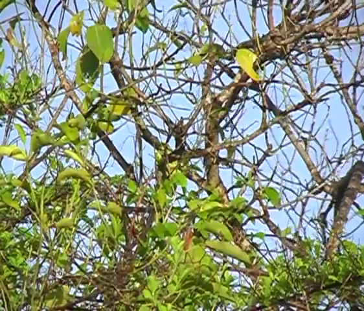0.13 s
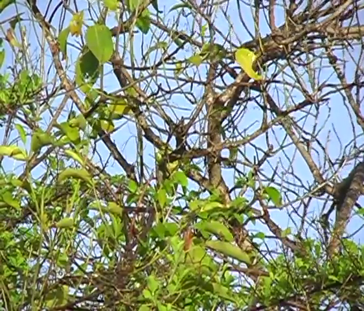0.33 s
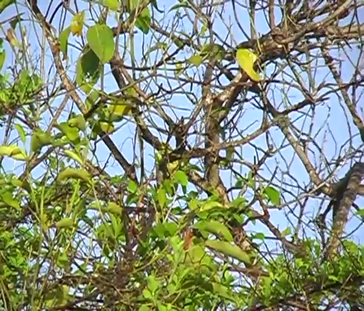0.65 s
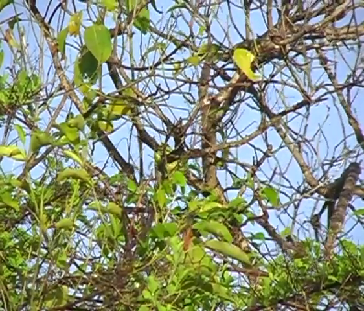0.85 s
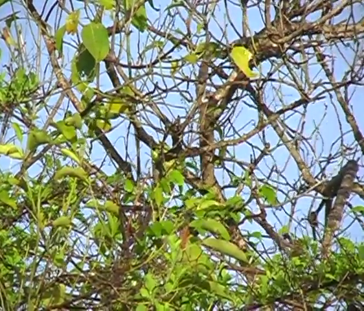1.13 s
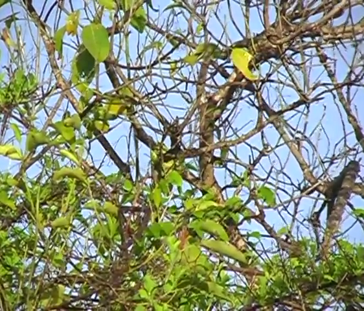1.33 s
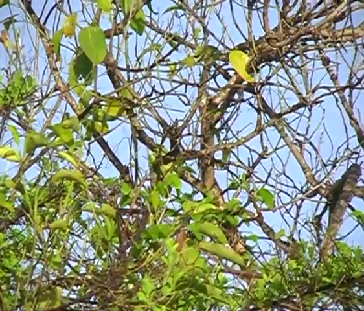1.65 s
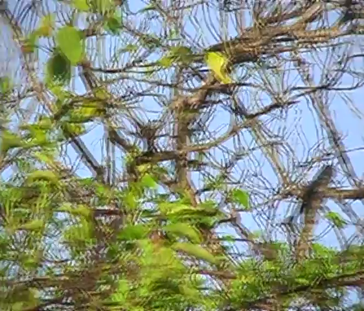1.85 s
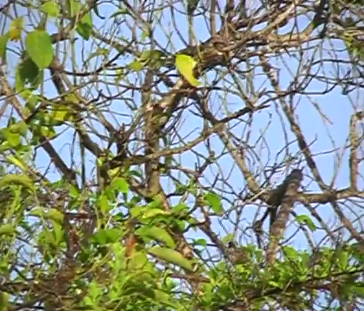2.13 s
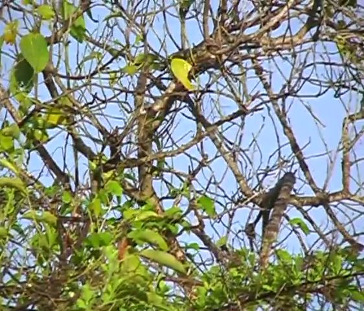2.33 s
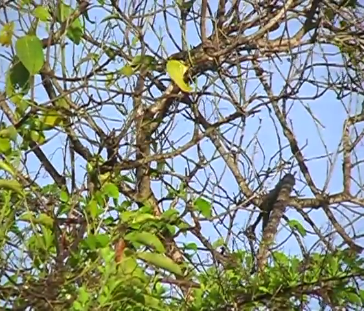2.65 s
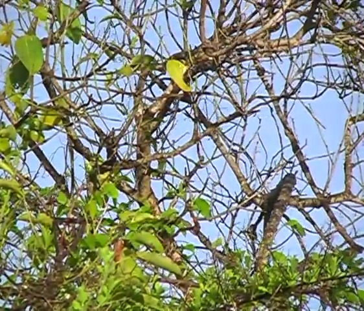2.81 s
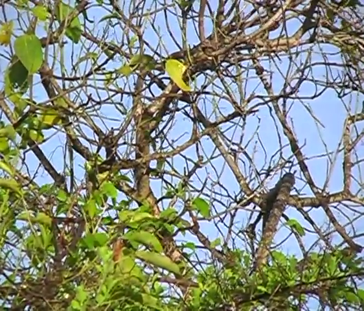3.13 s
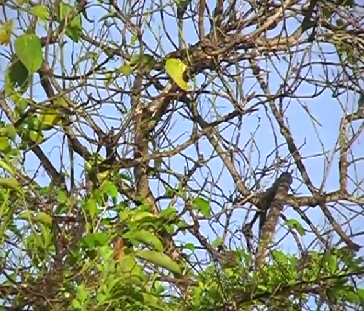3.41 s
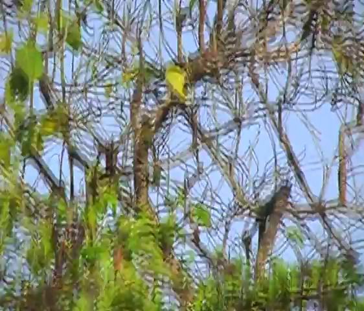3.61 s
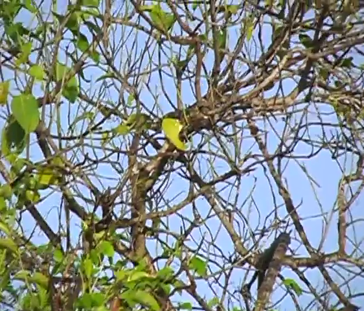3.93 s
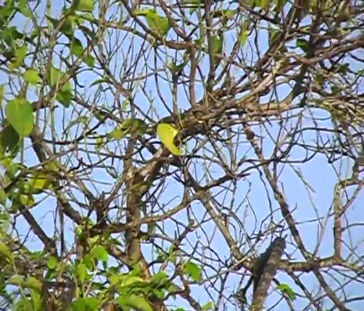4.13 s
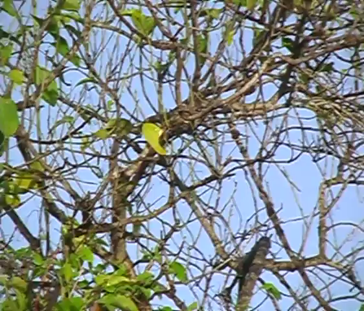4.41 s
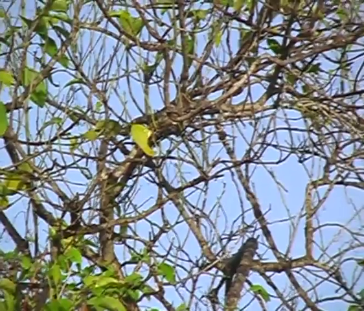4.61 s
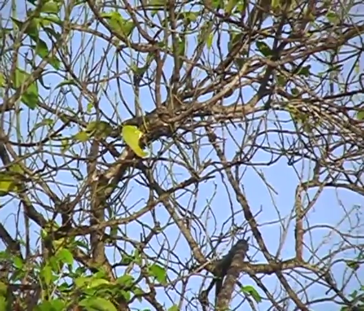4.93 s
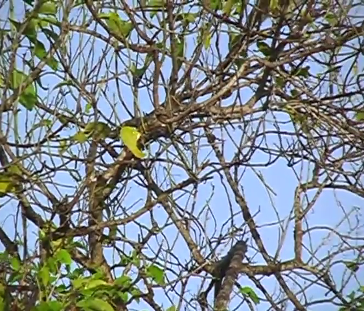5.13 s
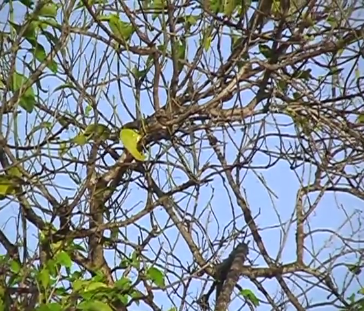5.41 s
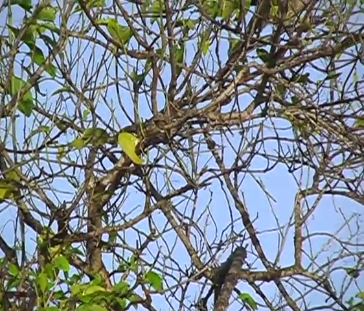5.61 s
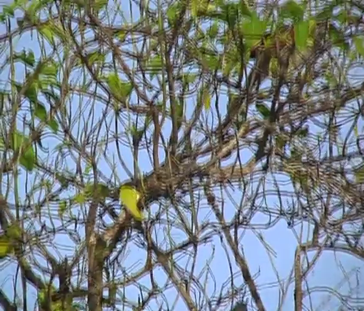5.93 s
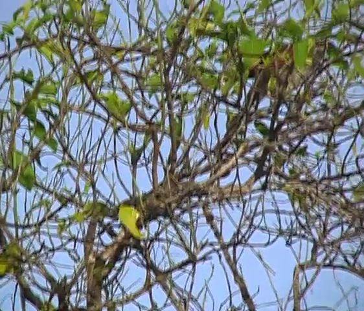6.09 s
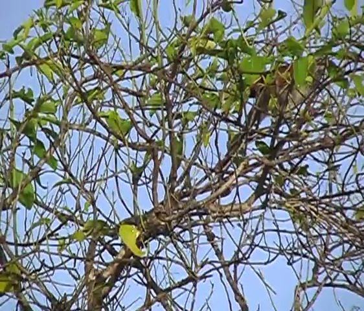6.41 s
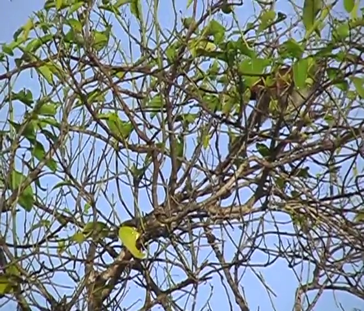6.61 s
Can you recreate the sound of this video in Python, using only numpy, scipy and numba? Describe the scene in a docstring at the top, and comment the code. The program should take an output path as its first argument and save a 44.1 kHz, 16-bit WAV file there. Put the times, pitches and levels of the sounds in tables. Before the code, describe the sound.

Outdoors among trees, a large hornbill gives short, nasal, rasping squawks that rise and suddenly break in pitch. Four early calls are followed by a pause with one small bird's chirp and churr, then three louder, rougher calls, the last longest. Small birds whistle quickly at the start. High cicadas pulse throughout, and a distant engine swells and fades early. The microphone is a few metres away, with a dull woodland tail.

```python
"""A wood: a hornbill squawks from a treetop a few metres off, in rasping notes that break from pitch to pitch.
Its pulses ring windpipe, beak and throat resonances; branches and trees add echoes and a dull tail.
Near-sine glides make small birds' whistles, two with a noisy churr, and at 5.47 s the last squawk's thin high tail.
Cicadas pulse as throbbing noise bands; a distant engine drone, in wavering noise bands, swells and fades
over shaped hiss; a twig ticks once."""
import sys
import numpy as np
from scipy import signal
from scipy.fft import rfft, irfft
from scipy.io import wavfile
from scipy.ndimage import uniform_filter1d
from numba import njit

SR = 44100
rng = np.random.default_rng(int(sys.argv[2]) if len(sys.argv) > 2 else 0)


def wav_record(signal):
    """Record a signal, one row per channel, as 16-bit PCM in the file named by sys.argv[1]."""
    frames = np.transpose(np.atleast_2d(signal))
    bounded = np.clip(frames, -1, 1)
    # unit amplitude maps onto the largest positive 16-bit level
    quanta = np.round(bounded * 32767).astype(np.int16)
    wavfile.write(sys.argv[1], SR, quanta)


N = 298116
TOP_HZ = 15780  # limit of the hornbill's partials and of the final low-pass


def undb(db):
    """dB to gain."""
    return 10 ** (np.asarray(db) / 20)


def level(x, db):
    """Scale to an rms level."""
    return x * undb(db) / np.sqrt(np.mean(x ** 2))


def curve(table):
    """Columns of a timed table, one value per sample."""
    s, *columns = np.transpose(table)
    return [np.interp(np.arange(N) / SR, s, c) for c in columns]


def gate(t0, t1, fade_s):
    """Sample range of a span and an envelope with soft ends."""
    start = int(t0 * SR)
    t = np.arange(start, min(int(t1 * SR), N)) / SR
    envelope = np.clip(np.minimum(t - t0, t1 - t) / fade_s, 0, 1)
    return slice(start, start + len(t)), envelope


@njit
def svf(x, hz, width):
    """State-variable band-pass, gain 1 at a centre that may move."""
    y, b, l = np.empty(len(x)), 0., 0.
    for i in range(len(x)):
        g, k = np.tan(np.pi * hz[i] / SR), width / hz[i]
        v = (b + g * (x[i] + 1e-18 - l)) / (1 + g * (g + k))
        b, l, y[i] = 2 * v - b, l + 2 * g * v, k * v
    return y


def band(x, hz, width):
    """Band-pass at a fixed or moving centre."""
    return svf(x, hz + np.zeros(N), 1. * width)


def twice(x, hz, width):
    """A resonance with steep skirts: two band-passes in series."""
    stage_width = 0.97 * width
    return band(band(x, hz, stage_width), hz, stage_width)


def ring(x, modes):
    """Parallel steep resonances of alternating sign."""
    return sum((-1.) ** k * undb(db) * twice(x, hz, width) for k, (hz, width, db) in enumerate(modes))


def walk(rate):
    """Random levels held 1 / rate s and slewed twice; spread near 1."""
    k = int(SR / rate)
    steps = np.repeat(rng.standard_normal(N // k + 1), k)
    return 1.26 * uniform_filter1d(uniform_filter1d(steps, k), k)[:N]


def place(x, left_minus_right_db):
    """Two channels, leaning to one side."""
    return x * undb(np.array([[left_minus_right_db], [-left_minus_right_db]]) / 2)


# hiss spectrum: (frequency [Hz], relative density [dB])
AIR_SPECTRUM = [(15, -85), (40, -60), (80, -17.5), (332, -2), (446, 3.5), (600, -5), (875, -5.5),
                (1350, -5), (1860, -11.5), (3000, -16.5), (6090, -27.5), (7500, -11.5), (9890, -29.5),
                (15600, -37)]
AIR_DB = -45
# far wash that comes and goes: (time [s], level [dB])
WASH_LEVEL = [(0, -53), (1.0, -50), (2.6, -57), (3.3, -70.5), (4.2, -57), (5.6, -48), (6.76, -51)]
# faint tones: (frequency [Hz], mean peak level [dB])
FAINT_TONES = [(4600, -69.5), (2300, -64)]


def woodland():
    """Shaped far hiss, nearly equal in both channels; a central wash near 1.4 kHz; two faint wavering tones."""
    f = np.arange(N // 2 + 1) * SR / N + 1
    air_hz, air_db = np.array(AIR_SPECTRUM).T
    colour = undb(np.interp(np.log(f), np.log(air_hz), air_db))
    mid, side = (irfft(rfft(rng.standard_normal(N)) * colour, N) for _ in range(2))
    hiss = level(mid + undb(-15.0) * side * np.array([[1], [-1]]), AIR_DB) * undb(0.2 * walk(2.86))
    wash = level(twice(rng.standard_normal(N), 1430, 400), 0) * undb(curve(WASH_LEVEL)[0])
    t = np.arange(N) / SR
    tones = sum(undb(db + 3.0 * walk(3.87)) * np.sin(2 * np.pi * hz * t) for hz, db in FAINT_TONES)
    return hiss + tones + wash


# engine resonances: (centre [Hz], width [Hz], relative level [dB])
ENGINE_BANDS = [(745.7, 56, 1), (1010, 44, -7.5), (506, 34, -11)]
DRONE_PEAK_S, DRONE_PEAK_DB, DRONE_REST_DB = 1.57, -39, -54.5
DRONE_RISE_DB_S, DRONE_FALL_DB_S = 8, 7
RUMBLE_START_DB, RUMBLE_FADE_DB_S = -64.5, 3


def drone():
    """A far engine nears and leaves, heard as wavering noise bands, with a low rumble that dies away."""
    hum = 0
    for hz, width, db in ENGINE_BANDS:
        centre_hz = hz * (1 + 0.0046 * walk(3.0))
        hum = hum + undb(db + 2.0 * walk(9)) * level(band(rng.standard_normal(N), centre_hz, width), 0)
    t = np.arange(N) / SR
    rise_db, fall_db = DRONE_RISE_DB_S * (DRONE_PEAK_S - t), DRONE_FALL_DB_S * (t - DRONE_PEAK_S)
    near_db = DRONE_PEAK_DB - np.maximum(rise_db, fall_db)
    rumble = level(twice(rng.standard_normal(N), 72.4, 28), RUMBLE_START_DB)
    return hum * np.hypot(undb(near_db), undb(DRONE_REST_DB)) + rumble * undb(-RUMBLE_FADE_DB_S * t)


# small birds' whistles, and at 5.47 s the thin high tail of the last squawk:
# (time [s], length [s], from [Hz], to [Hz], bend [<1 glides early, >1 late],
# loudest point [share of length], level before flutter and pan [dB])
HIGH_GLIDES = [(0.02, 0.043, 2060, 2870, 0.5, 0.83, -46.5), (0.125, .06, 3270, 3140, 0.53, 0.89, -43),
               (0.183, 0.017, 3200, 2740, 1.1, .3, -46), (0.22, .018, 2940, 2620, 1.01, .6, -44),
               (0.238, 0.032, 2580, 2960, 0.95, .6, -41), (0.285, 0.041, 3950, 3230, 1.7, 0.6, -28),
               (0.388, 0.039, 2300, 2270, 1.5, 0.33, -38.5), (0.435, 0.037, 2200, 2520, .4, .55, -37.5),
               (0.48, 0.069, 3430, 3390, 1, 0.71, -49), (0.545, 0.023, 3220, 2680, 1.1, .4, -47),
               (0.585, .04, 2820, 2006, 0.624, 0.17, -40.5), (0.642, 0.083, 2307, 2196, 0.7, 0.28, -36),
               (0.92, .03, 3290, 2870, 1.2, .6, -49), (0.955, 0.041, 6470, 5570, 0.5, .6, -51),
               (1.15, 0.041, 2740, 2440, 0.84, .55, -50.5), (2.922, 0.031, 3820, 3270, 0.37, 0.89, -31.5),
               (5.47, 0.056, 3200, 3260, 0.94, 0.59, -45.5), (5.645, .09, 3050, 2358, .55, 0.45, -49),
               (5.8, 0.079, 3320, 3470, 1.3, .7, -53.5), (5.872, .033, 3450, 2800, .8, .6, -50.5),
               (6.02, 0.063, 3137, 2480, 0.62, 0.79, -54), (6.245, 0.034, 3420, 3100, 1.1, .55, -58)]
# churrs after a falling whistle: (time [s], length [s], level before fades and pan [dB], left minus right [dB])
BIRD_CHURRS = [(0.32, 0.074, -29, 2.5), (2.95, 0.07, -31, -3)]
GLIDE_SWELL = 0.24  # exponent: small = square, large = pointed


def high_glides_and_churrs():
    """Whistles and a squawk's tail as near-sine glides; in a churr the tone swings wildly and breaks into noise."""
    glides, out = np.zeros(N), np.zeros((2, N))
    waver = 1 + .007 * walk(120)
    for t0, length, from_hz, to_hz, bend, crest, db in HIGH_GLIDES:
        span, fade = gate(t0, t0 + length, 0.0013)
        u = np.linspace(0, 1, len(fade))
        hz = from_hz + (to_hz - from_hz) * u ** bend
        swell = np.minimum(u / crest, (1 - u) / (1 - min(crest, .9))) ** GLIDE_SWELL
        phase = 2 * np.pi * np.cumsum(hz * waver[span]) / SR
        tone = np.sin(phase) + 0.059 * np.sin(2 * phase)
        glides[span] += np.sqrt(2) * fade * swell * undb(db) * tone
    wander = walk(260)
    rasp = twice(twice(rng.standard_normal(N), 3330, 3700), 3800, 3700)
    for t0, length, db, pan_db in BIRD_CHURRS:
        span, fade = gate(t0, t0 + length, 0.00093)
        t = np.arange(len(fade)) / SR
        hz = 2600 * np.exp(.26 * np.cos(2 * np.pi * 72 * t) + .1 * wander[span])
        phase = 2 * np.pi * np.cumsum(hz) / SR
        tone = np.sin(phase) + .3 * np.sin(2 * phase)
        churr = tone + 2.4 * np.minimum(t / .012, 1) * rasp[span]
        decay = np.clip((length - t) / 0.056, 0, 1)
        out[:, span] += place(fade * decay * level(churr, db), pan_db)
    flutter = undb(2.5 * walk(90))
    return out + place(glides * flutter, -2.3)


# tymbal bands: (centre [Hz], nominal width [Hz], level before swell and throb [dB])
TYMBAL_BANDS = [(7890, 130, -56.5), (7667, 230, -52), (7530, 44, -60)]
# same bands in each phrase: (enters [s], leaves [s], floor between phrases before the neighbour's drop [dB])
TYMBAL_PHRASE = [(0, .235, -22), (.04, .275, -8), (.1, .35, -7)]
CICADA_PHRASE_S, CICADA_START_S = .3747, .08


def cicadas():
    """One sings throbbing phrases of tymbal noise, bands entering in table order; fainter ones sing higher."""
    t = np.arange(N) / SR
    age_s = (t - CICADA_START_S) % CICADA_PHRASE_S
    throb = 1 + .38 * np.sin(2 * np.pi * np.cumsum(42.5 * (1 + .04 * walk(5))) / SR)
    # a neighbour fills the pauses, then drops to 0.35 gain near 5.6 s
    neighbour = np.clip((5.6 - t) / .1, .35, 1)
    out = 0
    for (hz, width, db), (enters, leaves, rest_db) in zip(TYMBAL_BANDS, TYMBAL_PHRASE):
        swell = np.clip(np.minimum(age_s - enters, leaves - age_s) / 0.012, undb(rest_db) * neighbour, 1)
        out = out + swell * throb * level(twice(rng.standard_normal(N), hz, width), db)
    pulse = np.clip(3.0 * np.sin(2 * np.pi * (t - 5.995) / .18) + 1.2, .3, 1)
    out = out + pulse * level(twice(rng.standard_normal(N), 9140, 280), -66.0)
    return out + neighbour * level(twice(rng.standard_normal(N), 8870, 500), -68.5)


# beak and throat per note: (from [s], beak resonance [Hz], nasal, palate, throat and top ring relative level [dB],
# roughness [0-1], strong-weak alternation [0-1])
NOTE_POSTURES = [(0.11, 1810, -16, -17, -24, -28, 0.086, 0.23), (0.24, 1570, -9, -13, -27, -9.5, .12, 0.2),
                 (0.6, 1600, -28, -22, -26, -30, 0.15, 0.32),
                 (0.755, 1650, -12.5, -20, -29, -33, 0.22, .03),
                 (1.2, 1780, -16.5, -16, -24, -11, 0.14, 0.32),
                 (1.36, 1610, -12, -17, -24, -11.5, 0.14, 0.027),
                 (1.77, 1550, -8.5, -18.5, -22.5, -15.5, 0.06, 0.091),
                 (1.86, 1415, -6.5, -10, -13.5, -15, 0.12, 0.036),
                 (1.93, 1660, -6, -14.5, -15, -28, 0.053, .01),
                 (2.04, 1566, -8, -14, -19.5, -24, 0.029, 0.018),
                 (2.2, 1510, -11.5, -19.5, -25, -24, 0.13, 0.048),
                 (3.77, 1600, -33, -18, -26, -25, 0.047, 0.033),
                 (3.85, 1642, -35, -12.5, -38, -24.5, 0.44, .04),
                 (3.945, 1597, -19.5, -15.5, -33, -19, 0.083, 0.054),
                 (4.014, 1620, -5, -15, -19, -9, 0.16, 0.24),
                 (4.31, 1655, -21, -13.5, -24, -24, 0.13, 0.12),
                 (4.428, 1456, -21, -9, -39, -18.5, 0.23, .15),
                 (4.49, 1620, -15.5, -11, -35, -19.5, .11, 0.028),
                 (4.58, 1537, -7.5, -10.5, -19, -14, 0.47, 0.065),
                 (4.87, 1580, -5.5, -9, -13.5, -22, 0.11, 0.045),
                 (4.969, 1450, 0, -5.5, -10, -6.5, 0.071, 0.011),
                 (5.02, 1450, -13, -4.5, -16.5, -9.5, 0.036, 0.029),
                 (5.099, 1660, -5, -9, -11, -14.5, 0.17, 0.03),
                 (5.194, 1520, -8, -7, -10.5, -24, 0.037, .02),
                 (5.36, 1598, -11.5, -12.5, -18, -22, 0.15, .01)]
NOTE_GLIDE_S = 0.016
ONSET_RASP, ONSET_S, TAIL_RASP, TAIL_S = 0.508, 0.0385, 0.491, 0.026  # roughness added at call ends
FAINT_DB, FAINT_BRIGHT_DB_PER_DB = -30.5, 0.19  # lift of the upper rings below this level


def posture(db):
    """Each note's setting, gliding into the next; rasp at the ends of a call, brighter when faint."""
    t = np.arange(N) / SR
    starts, *columns = np.transpose(NOTE_POSTURES)
    note = np.maximum(np.searchsorted(starts, t) - 1, 0)
    beak_hz, nasal_db, palate_db, throat_db, top_db, rough, alternation = (
        uniform_filter1d(c[note], size=int(NOTE_GLIDE_S * SR)) for c in columns)
    for call in SQUAWK_CALLS:
        rough = rough + ONSET_RASP * np.exp(-((t - call[0][0]) / ONSET_S) ** 2)
        rough = rough + TAIL_RASP * np.exp(-((t - call[-1][0]) / TAIL_S) ** 2)
    lift_db = FAINT_BRIGHT_DB_PER_DB * np.maximum(FAINT_DB - db, 0)
    rings_db = [ring_db + lift_db for ring_db in (nasal_db, palate_db, throat_db, top_db)]
    return beak_hz, *rings_db, np.clip(rough, 0, 1), np.clip(alternation, 0, 1)


def syrinx(hz, on, rough, alternation):
    """A sharp pulse per cycle; roughness shakes timing and size and lets air hiss, alternation adds half lines."""
    phase = 2 * np.pi * np.cumsum(hz * (1 + .085 * rough * walk(350))) / SR
    pulses = np.zeros(N)
    for k in np.arange(.5, 48, .5):
        share = 1. if k % 1 == 0 else alternation[on]
        # upper partials lag, which spreads the pulse a little
        pulses[on] += share * np.cos(k * phase[on] - 0.028 * k * k) * (k * hz[on] < TOP_HZ)
    hiss = (1 + .5 * np.cos(phase)) * rng.standard_normal(N)
    shimmer = undb(5.0 * rough * walk(300))
    return pulses * shimmer + 2.8 * rough * hiss


# one table per call, close rows are pitch breaks: (time [s], mean pulse rate [Hz], effort level [dB])
SQUAWK_CALLS = [
    [(0.11, 461, -43), (0.134, 452.5, -40.5), (0.196, 455.5, -32.5), (0.236, 490, -29), (0.244, 355, -28.5),
     (0.282, 410.6, -33), (0.32, 407.4, -33.5), (0.335, 429, -38.5)],
    [(0.6, 444, -47), (0.62, 450.7, -42), (0.678, 451.6, -33), (0.751, 496, -27), (0.759, 361.7, -34),
     (0.819, 400.4, -25), (0.849, 395, -29.5), (0.89, 314, -40)],
    [(1.2, 448.2, -44), (1.236, 428.7, -38.5), (1.31, 476, -29), (1.356, 482.4, -28), (1.364, 366.9, -30),
     (1.41, 398.6, -22.5), (1.45, 384, -30.5), (1.48, 355, -39.5)],
    [(1.777, 346, -38), (1.791, 350, -29), (1.821, 381, -26.5), (1.865, 445.7, -22.5),
     (1.888, 489.3, -19.5), (1.931, 414.3, -24), (2.093, 430.6, -22), (2.172, 414.2, -23),
     (2.206, 400, -20.5), (2.24, 349.3, -26), (2.26, 354.3, -37.5)],
    [(3.77, 249.1, -47), (3.798, 271.4, -34.5), (3.844, 298.8, -27), (3.856, 328, -27.5),
     (3.941, 326, -23.5), (3.949, 357, -23), (3.987, 404, -15.5), (4.01, 388.4, -22.5), (4.018, 442, -21.5),
     (4.055, 428, -46.5)],
    [(4.31, 467.6, -60), (4.324, 474.7, -36), (4.382, 441.5, -23), (4.456, 465.7, -23), (4.464, 350.8, -22),
     (4.524, 380.8, -19), (4.548, 395, -13), (4.578, 384.6, -20.5), (4.586, 466.3, -20.5),
     (4.635, 424.7, -43)],
    [(4.87, 306.5, -48), (4.89, 331, -29.5), (4.94, 426.7, -14), (4.98, 436, -19), (5.026, 473.8, -10.5),
     (5.092, 469.2, -10.5), (5.152, 411, -17.5), (5.17, 373.5, -20.5), (5.198, 412.3, -17),
     (5.255, 414.6, -17), (5.305, 418.5, -20), (5.398, 390.8, -15), (5.442, 323, -27.5), (5.47, 295.8, -38)],
]
# low resonances: (centre [Hz], nominal width [Hz], relative level [dB])
WINDPIPE_RINGS = [(1301, 62, -1.5), (1950, 228, -8.5)]
# throat resonances: (centre [Hz], nominal width [Hz], relative level [dB])
THROAT_RINGS = [(5480, 1110, 16), (7140, 900, -1.5)]
# top resonances, opened by effort: (centre [Hz], nominal width [Hz], relative level [dB])
TOP_RINGS = [(8200, 3500, 7.5), (11430, 2300, -8), (13500, 5800, -0.5)]
# near reflections: (mean delay [s], level [dB])
BRANCH_ECHOES = [(.0013, -7), (.0031, -4), (.0074, -7), (.0127, -11)]
CALL_MARGIN_S = .006  # a call fades in and out just beyond its ends


def hornbill():
    """Pulses ring windpipe, beak and throat; branches add swaying echoes that make partials fade and return."""
    hz, db = curve(np.concatenate(SQUAWK_CALLS))
    db = uniform_filter1d(db, size=350)
    voiced = np.zeros(N)
    for call in SQUAWK_CALLS:
        voiced[int((call[0][0] - CALL_MARGIN_S) * SR):int((call[-1][0] + CALL_MARGIN_S) * SR)] = 1
    voiced = uniform_filter1d(voiced, size=600)
    beak_hz, nasal_db, palate_db, throat_db, top_db, rough, alternation = posture(db)
    air = syrinx(hz, voiced > 1e-6, rough, alternation)
    now = np.arange(N)
    echoes = sum(undb(echo_db) * np.interp(now - SR * (s + 0.00019 * walk(7)), now, air)
                 for s, echo_db in BRANCH_ECHOES)
    air = air + echoes
    (low_hz, low_width, low_db), (pipe_hz, pipe_width, pipe_db) = WINDPIPE_RINGS
    low = twice(air, beak_hz, 350) + undb(low_db) * twice(air, low_hz, low_width)
    # (ring, level [dB]): the top grows faster than the rest and with rasp
    parts = [(low, db),
             (twice(air, pipe_hz, pipe_width), db + pipe_db),
             (twice(air, 2744, 1070), db + nasal_db),
             (twice(air, 4367, 800), db + palate_db),
             (ring(air, THROAT_RINGS), db + throat_db + 2.0),
             (ring(air, TOP_RINGS), 1.42 * db + top_db + 21.0 * rough - 2),
             (twice(air, hz, 93), 1.066 * db - 26.0)]  # fundamental
    # running rms is divided out: effort sets loudness wherever the partials fall
    voice = sum(undb(part_db) * x / np.sqrt(uniform_filter1d(x ** 2, size=1300) + 1e-6) for x, part_db in parts)
    # the chest hums most in rasping notes and grows slowly with effort
    chest_db = 0.8 * db + 21 * np.minimum(rough + alternation, .6) - 26.0
    return voiced * (voice + undb(chest_db) * twice(air, 948, 284))


def trees(x, t60_s, wet_db):
    """Trunks and leaves scatter a dull, thin tail, partly different in each channel."""
    t = np.arange(int(.7 * SR)) / SR
    decay = np.exp(-np.log(1000) * t / t60_s) * np.clip(t / 0.0022, 0, 1)
    mid, side = rng.standard_normal((2, len(t))) * decay
    tail = level(mid + 0.31 * side * np.array([[1], [-1]]), wet_db) / np.sqrt(len(t))
    return signal.fftconvolve(band(x, 3000, 2500)[None], tail, axes=1)[:, :N]


# ticks: (time [s], impulse level before the resonances [dB])
TWIG_TICKS = [(3.8236, -11)]


def twig():
    """A dry tick: an impulse rings a narrow and a broad resonance."""
    x = np.zeros(N)
    for s, db in TWIG_TICKS:
        x[int(s * SR)] = undb(db)
    return 10.0 * band(x, 3680, 290) + 0.84 * band(x, 8500, 6900)


def scene():
    """Bird voices with their tail among the trees, the twig, and the cicadas, drone and air around them."""
    bird, high = hornbill(), high_glides_and_churrs()
    # the ports sit a little apart, so the side holds the treble of close sounds
    treble = undb(-19) * band(bird, 4100, 1800) + undb(-33) * band(bird, 18600, 6000)
    side = treble * np.array([[-1], [1]])
    tail = trees(bird + 0.81 * high[0], 0.85, -14.5)
    return bird + side + high + tail + twig() + cicadas() + drone() + woodland()


def record(dry):
    """The microphone bends on loud calls, which adds a low thump and rounds the peaks; the top is cut."""
    bend = signal.sosfilt(signal.butter(1, 60, "high", fs=SR, output="sos"), dry ** 2)
    rounded = 1.5 * np.tanh((dry - .03 * bend) / 1.5)
    return signal.sosfilt(signal.ellip(12, .2, 80, TOP_HZ, fs=SR, output="sos"), rounded)


dry = scene()
out = record(dry)
wav_record(out)
```